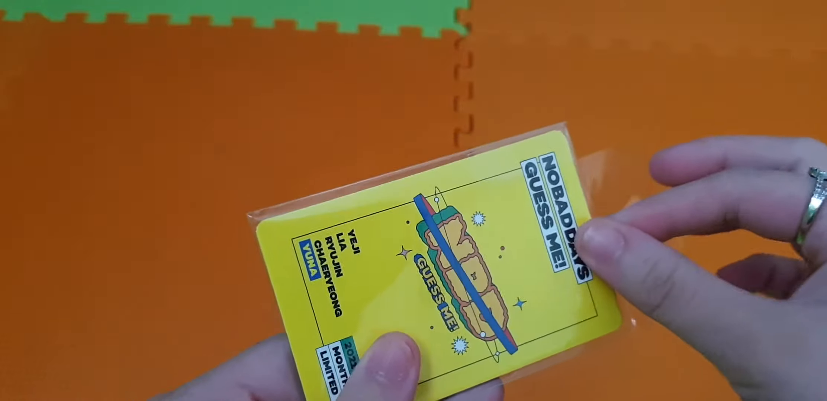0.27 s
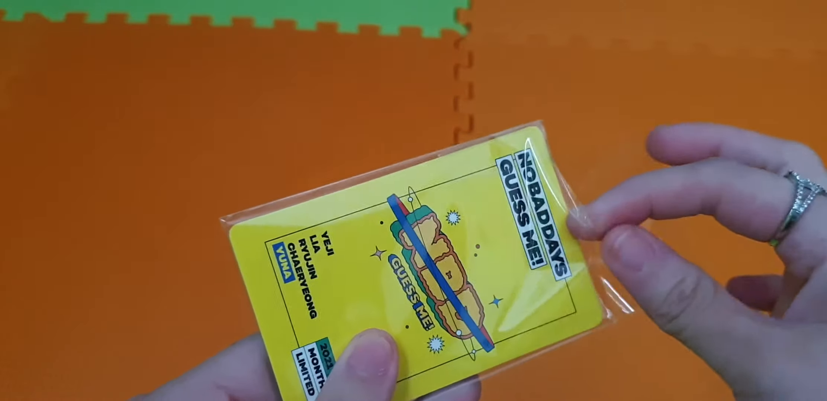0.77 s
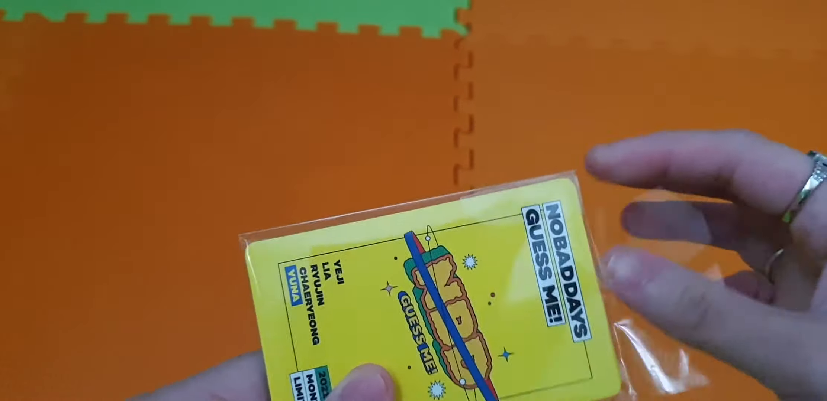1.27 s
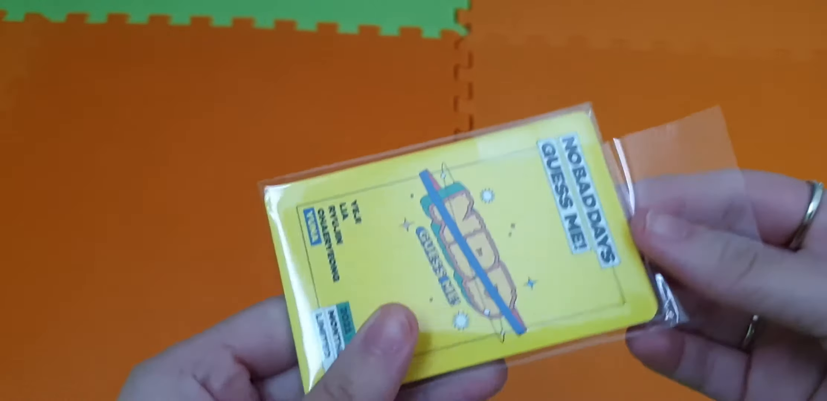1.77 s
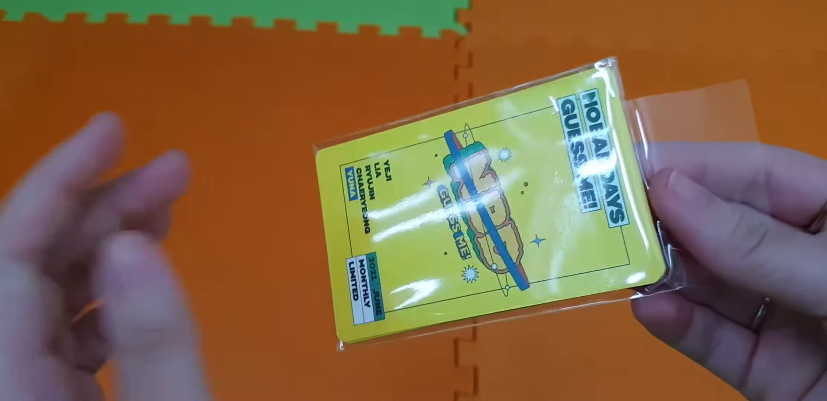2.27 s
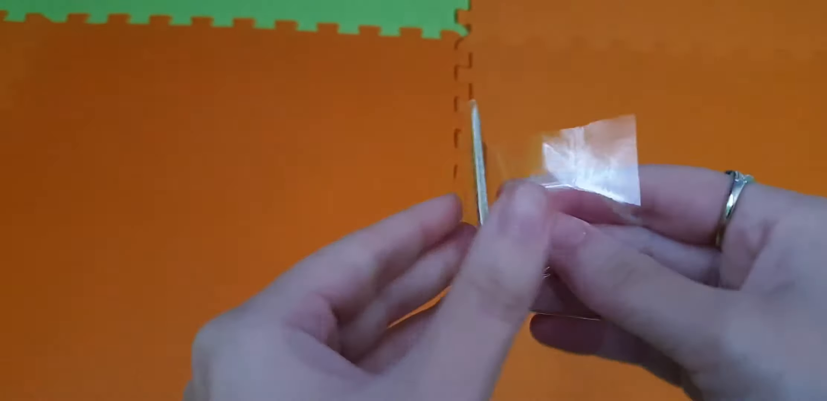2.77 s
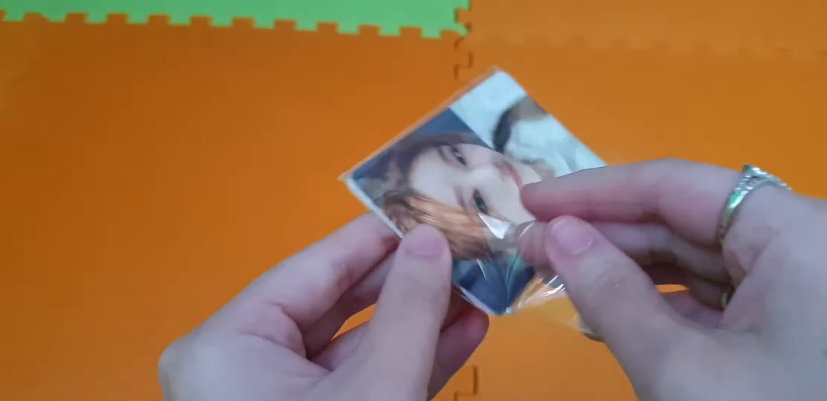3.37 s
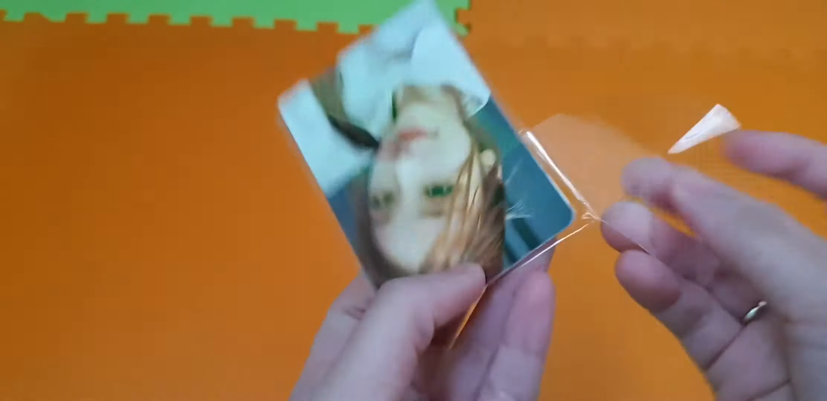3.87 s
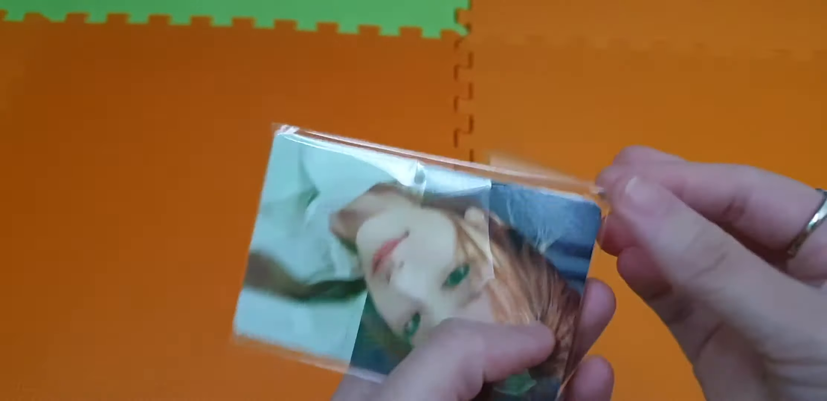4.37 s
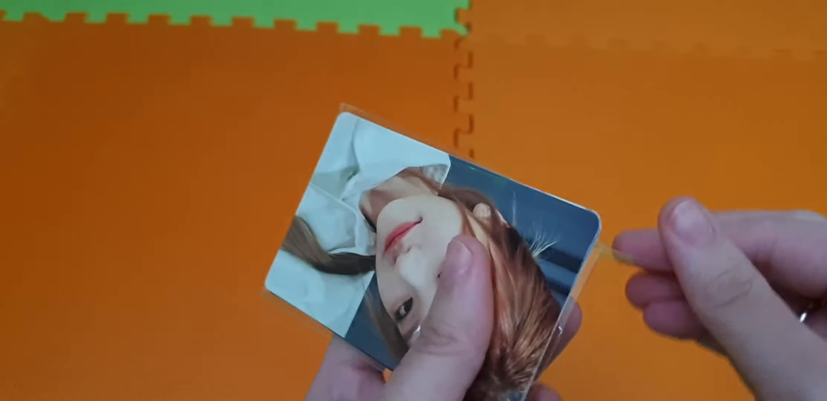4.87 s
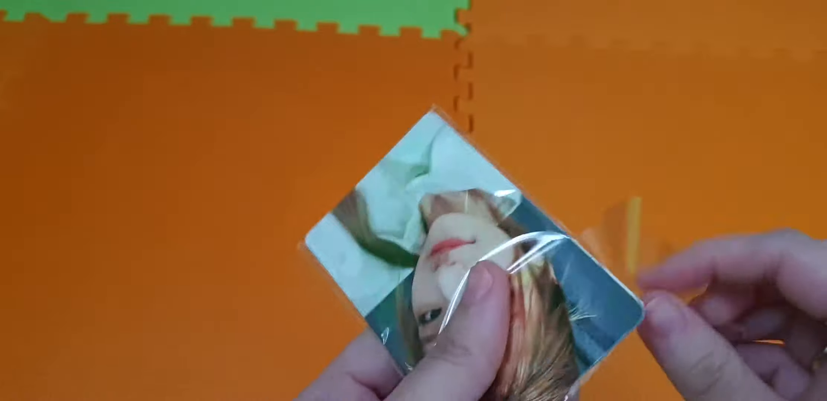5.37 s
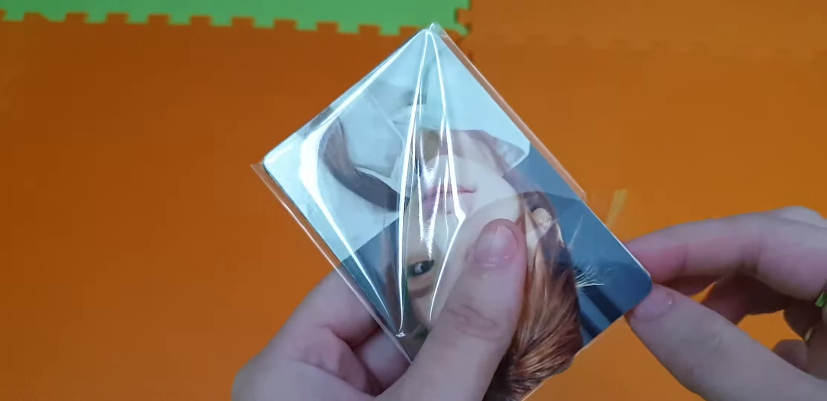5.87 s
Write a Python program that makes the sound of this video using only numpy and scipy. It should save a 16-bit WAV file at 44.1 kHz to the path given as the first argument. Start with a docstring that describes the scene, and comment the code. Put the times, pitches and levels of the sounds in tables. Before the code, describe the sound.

Fingers pick at a thin plastic sleeve and peel it off a card, close to the microphone in a small room. Light rustles, rubs and scattered ticks come first, then a brief pause, then a busy run of sharp crackles and snaps that thins near the end. Underneath are a low motor hum, faint hiss and distant traffic, with a muffled engine slowing and pulling away.

```python
"""Fingers tear and peel a thin plastic sleeve off a card, close under a two-port microphone.
From the start a motor hums and low traffic rumble swells and fades over a faint hiss.
The film rustles and rubs, then its creases buckle with sharp snaps; a foam floor mat returns each
a moment later and the room rings on. After a second a vehicle engine swells through the wall.
The snaps crowd in from 2.7 s and thin out near 6 s, while the engine slows and then pulls away."""
import sys
import numpy as np
from scipy import signal
from scipy.fft import rfft, irfft
from scipy.io import wavfile

SR = 44100
rng = np.random.default_rng(int(sys.argv[2]) if len(sys.argv) > 2 else 0)


def int16_out(signal):
    """Quantize to a 16-bit WAV file."""
    q = np.round(np.clip(np.atleast_2d(signal).T, -1, 1) * 32767)
    wavfile.write(sys.argv[1], SR, q.astype(np.int16))


N = 269892
TIME_S = np.arange(N) / SR


def from_db(db):
    """Amplitude grows tenfold every 20 dB."""
    return 10 ** (np.asarray(db) / 20)


def unit_rms(x):
    """Normalisation to unit mean power."""
    return x / np.sqrt(np.mean(x ** 2) + 1e-20)


def in_time(rows):
    """Linear interpolation of each column after the time, one value per sample."""
    time_s, *columns = np.transpose(rows)
    return [np.interp(TIME_S, time_s, column) for column in columns]


def at_hz(points, hz):
    """Interpolation on a log-frequency axis."""
    knots_hz, values = np.transpose(points)
    return np.interp(np.log(hz), np.log(knots_hz), values)


def band(x, low_hz, high_hz, order=2):
    """Butterworth band-pass."""
    return signal.sosfilt(signal.butter(order, [low_hz, high_hz], "band", fs=SR, output="sos"), x)


def drift(rate_hz):
    """Low-passed noise: a slow random fluctuation with a spread of about 1."""
    hop = 40
    pole = np.exp(-2 * np.pi * hop * rate_hz / SR)
    slow = signal.lfilter([1], [1, -2 * pole, pole * pole], rng.standard_normal(N // hop + 2002))[2000:]
    return np.interp(np.arange(N) / hop, np.arange(len(slow)), unit_rms(slow))


def port_pair(mid, side, coherence):
    """Partial coherence: the ports share one noise in phase and another in antiphase."""
    return np.sqrt(1 + coherence) * mid + np.sqrt(1 - coherence) * side * [[1], [-1]]


# likeness of noise at the two ports: frequency_hz, coherence
NOISE_COHERENCE = [(30, 1), (120, 0.85), (500, 0.78), (2000, 0.14), (8000, 0.15)]
def coloured_noise(spectrum):
    """Spectral shaping of stereo noise to unit rms, most coherent in the bass."""
    hz = np.maximum(np.fft.rfftfreq(N, 1 / SR), 1)
    mid, side = rfft(rng.standard_normal((2, N)))
    white = port_pair(mid, side, at_hz(NOISE_COHERENCE, hz))
    return unit_rms(irfft(white * from_db(at_hz(spectrum, hz)), N))


def drone(hz, level_db, orders, waver_db):
    """A turning machine radiates a line spectrum; each line wavers on its way through walls."""
    phase = 2 * np.pi * np.cumsum(hz) / SR
    lines = 0
    for multiple, gain_db in orders:
        gain = from_db(gain_db + waver_db * drift(4.57))
        lines += gain * np.sin(multiple * phase + rng.uniform(0, 2 * np.pi))
    return np.sqrt(2) * from_db(level_db) * lines


# swell of the hum: time_s, level_db
MOTOR_LEVELS = [(0, -51), (1.5, -55), (4.2, -68), (5, -50.5), (6.12, -44.5)]
# partials of the hum: pitch_multiple, gain_db
MOTOR_ORDERS = [(1, -0.5), (1.5, -12), (2, -20), (2.5, -15), (3, -19.5)]
def motor(pitch_hz=84.93, wander_hz=1.5):
    """Periodic vibration: the partials move together as the motor's pitch wanders."""
    hz = pitch_hz + wander_hz * drift(1.436)
    return drone(hz, *in_time(MOTOR_LEVELS), MOTOR_ORDERS, waver_db=2.0)


# swell of the two rumble layers: time_s, deep_db, upper_db
TRAFFIC_LEVELS = [(0, -51.5, -61.5), (1.2, -47.5, -62), (1.5, -50, -59.5), (2.0, -39.5, -58.5),
                  (2.5, -43.5, -59.5), (3.4, -45.5, -64), (3.7, -47, -56.5), (4.4, -47.5, -57),
                  (4.6, -43, -59), (5.4, -49.5, -51.5), (6.12, -40, -50.5)]
# spectra of those layers: frequency_hz, relative_density_db
DEEP_SPECTRUM = [(15, -51.5), (25, -41), (60, 9), (86, 1.5), (110, 0.5), (177, -7.5), (260, -22.5),
                 (340, -28), (570, -120)]
UPPER_SPECTRUM = [(180, 4), (250, -1), (330, 1.5), (450, 2), (540, -7.5), (640, -18), (800, -39)]
def traffic(deep_gain_db=-3.5):
    """Amplitude modulation: two layers of low noise swell and fade as traffic rumble."""
    deep_db, upper_db = in_time(TRAFFIC_LEVELS)
    deep = from_db(deep_db + deep_gain_db) * coloured_noise(DEEP_SPECTRUM)
    return deep + from_db(upper_db) * coloured_noise(UPPER_SPECTRUM)


# spectrum of the hiss: frequency_hz, relative_density_db
HISS_SPECTRUM = [(350, -13), (600, -7), (834, -2), (1130, 0.5), (1410, -3.5), (1610, -7.5), (1960, -2.5),
                 (2760, -3), (4000, -22.5), (6370, -57.5), (10500, -23.5), (14500, -9), (16000, -28)]
def hiss(level_db=-76):
    """Stationary noise of the room and preamplifier sets the noise floor."""
    return from_db(level_db) * coloured_noise(HISS_SPECTRUM)


# bouts of handling the film: start_s, length_s, low_rustle_db, high_rustle_db, rub_db
BOUTS = [(0.0, 0.025, -68.5, -78, -72.5), (0.184, 0.027, -44.5, -60, -47), (0.506, .27, -76, -66, -74.5),
         (1.002, 0.33, -75, -70, -69.5), (1.253, 0.12, -59.5, -62, -66.5), (1.42, 0.47, -88, -72, -69),
         (1.679, 0.24, -73, -75, -77.5), (2.686, 0.14, -51, -48.5, -72), (2.875, 0.15, -90, -78, -82),
         (3.021, 0.1, -68, -61.5, -70), (3.172, 0.46, -80, -60.5, -63.5), (3.423, 0.091, -55, -50, -55),
         (3.497, 0.23, -56.5, -53, -57), (3.73, 0.29, -61, -50, -69), (4.079, 0.37, -65, -58.5, -64.5),
         (4.44, 0.12, -93, -64, -64.5), (4.599, .32, -71, -74, -57), (4.943, .35, -67, -70.5, -69.5),
         (5.353, 0.052, -51, -42, -49.5), (5.4, 0.052, -42, -63, -54.5), (5.48, 0.096, -53.5, -74, -60),
         (5.578, 0.1, -59, -65, -61.5), (5.705, 0.26, -69.5, -100, -100), (5.794, 0.07, -88, -100, -82),
         (5.983, 0.1, -59.5, -71, -63)]
def handling_levels(grip_db_per_s=20 / 0.0074, settle_db_per_s=595):
    """Exponential growth and decay: a bout swells, holds and dies as the film settles; the loudest leads."""
    t, levels_db = np.arange(0, N / SR, .001), -120
    for start_s, length_s, *held_db in BOUTS:
        before_s, after_s = np.maximum(start_s - t, 0), np.maximum(t - start_s - length_s, 0)
        fall_db = grip_db_per_s * before_s + settle_db_per_s * after_s
        levels_db = np.maximum(levels_db, np.array(held_db)[:, None] - fall_db)
    return [np.interp(TIME_S, t, db) for db in levels_db]


def rustle(level_db, low_hz, high_hz, spread_db, pan_db, median_per_s=1200):
    """A clumped Poisson process: tiny creases give way and excite broad resonances of the film."""
    impulses = from_db(spread_db * np.minimum(rng.exponential(1, N), 5)) * rng.choice([-1, 1], N)
    gives_way = rng.random(N) < median_per_s * from_db(5 * drift(25)) / SR
    resonance, out = rng.integers(0, 8, N), 0
    for k, hz in enumerate(np.geomspace(low_hz, high_hz, 8)):
        grains = band(impulses * gives_way * (resonance == k) + 1e-18, hz / 1.54, hz * 1.75, order=1)
        lag = rng.integers(0, 7)   # creases lie at different distances from the ports
        pair = np.array([np.roll(grains, lag), np.roll(grains, 3)])
        out += pair * from_db(pan_db * rng.normal() * np.array([[1], [-1]]))
    return from_db(level_db) * unit_rms(out)


# spectrum of skin sliding on film: frequency_hz, relative_density_db
RUB_SPECTRUM = [(700, -12.5), (1500, -2.5), (3000, -8), (6500, -7), (11000, -3), (16000, -7)]
def finger_rub(level_db, flutter_db=5.6):
    """Sliding friction makes broadband noise whose level flutters."""
    return from_db(level_db + flutter_db * drift(13)) * coloured_noise(RUB_SPECTRUM)


# loud creases: start_s, level_db, thud_db, body_db, middle_db, left_minus_right_db
# (thud, body and middle offset the level in the three lowest bands)
SNAPS = [(0.162, -56.5, -7, -3, -2, -7), (0.183, -28, -14.5, -14, -12, -4.5),
         (0.1923, -34, -23, -14, -36, 3.5), (0.1935, -33.5, -19, -7.5, -18, -6),
         (0.1994, -37, -30, -11, 0, -11), (0.2029, -39.5, -29, -5, -3, 1),
         (0.3272, -34, -31, -49, -25, 1.5), (0.5267, -51, -23, -32, -23, 4),
         (0.5427, -42.5, -26, -21, -21, 5), (0.5932, -25, -48, -24.5, -37.5, 7),
         (0.615, -39.5, -29, -29, -19, 3), (0.628, -33, -34, -40, -38, 4),
         (0.6816, -32, -29, -24.5, -31, -1), (0.6927, -40, -39, -24, -32, 10),
         (0.7067, -35, -30, -50, -37, -2), (0.7209, -42.5, -30, -23, -27, 8),
         (0.7599, -39, -33, -24, -29, 4), (1.0045, -45.5, -30, -41, -43, -14),
         (1.0306, -42, -24, -23, -35, -1.5), (1.0424, -45, -20, -19, -33, 0),
         (1.0849, -14.5, -41, -30, -39, 3), (1.1476, -28, -39, -27, -32, 1.5),
         (1.2037, -43, -35, -13, -29, 3), (1.2423, -55.5, -23, -11, -5, -2),
         (1.2674, -39.5, -28, -6, -22, -1), (1.3092, -42, -19.5, -20, -24, 2.5),
         (1.3255, -39.5, -9, -11, -19, 1.5), (1.3912, -48, -16, -12, -28, 4),
         (1.4067, -46.5, -12, -29, -28, 0), (1.6257, -50.5, -9, -11, -16.5, 8.5),
         (1.7125, -51, -10.5, -9, -29, 6), (1.7444, -43, -15, -17.5, -27, 4),
         (1.7747, -42.5, -17, -27, -31, 3.5), (1.812, -39.5, -22, -36, -36, -0.5),
         (1.8613, -41, -30, -16, -28.5, 4.5), (1.8881, -47, -28, -33, -24.5, 6),
         (2.6931, -20.5, -40, -25.5, -23, 4), (2.721, -21.5, -22, -20, -20, 0),
         (2.7399, -20.5, -37, -24, -20, 5.5), (2.7442, -13.5, -62, -20, -31, -6),
         (2.7532, -28.5, -21, -4.5, -27, 9), (2.7632, -28, -27, -6, -24, 4),
         (2.7706, -28, -25, -11.5, -32, 7), (2.7804, -6.5, -43, -20, -34, 0.0),
         (2.797, -39.5, -5, -13.5, -29, 15.5), (2.8095, -31.5, -25, -11, -21, 8),
         (2.818, -19.5, -34, -18.5, -19, -1.5), (2.8415, -23.5, -39, -17.5, -25.5, 2),
         (3.028, -44, -28, -22, -30, 5.5), (3.041, -18, -58, -32, -41, 7), (3.1687, -51, -13, -37, -13, 7),
         (3.1833, -48, -22, -34, -11, 5), (3.2067, -45, -27, -31, -12, 14),
         (3.2277, -24.5, -44, -47, -24, -3), (3.2596, -44, -25, -26, -16, 10),
         (3.2833, -26.5, -42, -28, -26, 6.5), (3.3588, -23.5, -31, -22.5, -15.5, 4.5),
         (3.44, -38, -35, -29, -5, 8), (3.4511, -40, -38, -17, -7, 6.0), (3.4601, -33, -35, -11, -5, 7),
         (3.477, -28, -28.5, -6.5, -10, 6.0), (3.495, -28.5, -23, -10, -11, 4.5),
         (3.5267, -30.5, -28, -5, -16, 3.5), (3.5399, -18, -45, -27, -26, -0.5),
         (3.5815, -24, -25, -12, -15, 2.5), (3.6183, -16.5, -32, -20.5, -19.5, 4.5),
         (3.6564, -39.5, -22, -7, -29, 5), (3.6646, -30.5, -20.5, -19, -36, 2),
         (3.725, -41.5, -26, -6.5, -5, 4.5), (3.7633, -38, -36, -7.5, -5, 2),
         (3.7776, -31, -36, -22, -3.5, 0.5), (3.7966, -39, -25, 1, 4, 2), (3.8116, -16, -49, -8, -7.5, 0.5),
         (3.869, -42, -23, -25, -10, -1), (3.8884, -9.5, -35, -22, -35, 4),
         (3.9217, -11.5, -28, -21.5, -13, 1.5), (3.9434, -33.5, -29, -18, -6.5, 2),
         (3.955, -13, -42, -26, -9, 0.5), (4.0914, -29.5, -33, -39, -21.5, -0.5),
         (4.1436, -19.5, -15.5, -16.5, -20, -0.5), (4.2168, -30.5, -32, -10.5, -7, -1),
         (4.3046, -16.5, -39, -22.5, -26, 0.0), (4.3832, -40, -31, -5, -4, 2),
         (4.3935, -29, -21, -18, -12, 0), (4.5274, -44.5, -24, -39, -38, 8),
         (4.5962, -41, -39, -38, -25, 11.5), (4.6222, -36.5, -21, -28, -18, 8),
         (4.6399, -19, -32.5, -19.5, -18, 4), (4.665, -41, -13, 0, -4, 2),
         (4.6874, -17, -43, -14.5, -16, 3.5), (4.7101, -36.5, -8, -9, -5.5, 0),
         (4.7532, -33, -32, -15.5, -10.5, 1), (4.797, -41.5, -30, -34, -12.5, 8),
         (4.8115, -32, -33, -25, -14, 2), (4.8291, -26.5, -29, -22, -10.5, 1),
         (4.857, -5, -42, -26.5, -21, 3), (4.8827, -26.5, -15, -22, -16, 0.5),
         (4.9715, -28.5, -38, -19, -9.5, -0.5), (5.0207, -43.5, -15, -6.5, -7.5, 6.5),
         (5.0577, -36.5, -22, -13, -12, 1.5), (5.0856, -40, -9, -17, -13, 0.5),
         (5.1462, -31, -30, -31, -6, -1), (5.2141, -41, -15, -67, -29, -5.5),
         (5.2656, -39, -17, -49, -15, -1), (5.3315, -50, -25.5, -18, 3.5, 0),
         (5.3664, -40, -29, -40, -25, 1), (5.3986, -28, -31, -8, -12, 0),
         (5.4086, -23.5, -22, -24, -21, -2.5), (5.4447, -24.5, -26, -13.5, -11.5, -1),
         (5.449, -10.5, -39, -28, -16, -0.5), (5.5216, -29, -23, -13.5, -11, -1),
         (5.5416, -26.5, -19, -18, -27, -2.0), (5.6456, -32, -15.5, -19.5, -10.5, 2.5),
         (5.9866, -45.5, -10, 2.5, -6, 0.5), (6.0327, -19, -25.5, -17.5, -27, -5.5)]
# bands in which the film rings: low_hz, high_hz
SNAP_BANDS = [(280, 560), (900, 2500), (2500, 5000), (5000, 10000), (10000, 17000)]
# ring of each band: t60_s
SNAP_DECAYS = [0.016, 0.013, 0.0044, 0.0039, 0.0011]
# weight of each band: gain_db
SNAP_GAINS = [2.5, 6.5, 6, -2, -1.5]
def snaps(rise_s=0.00038, spike_height=4.74, port_lag_s=.00007, widths=(.15, .25, .5, .7, .8)):
    """Buckling releases a pulse and a damped noise burst, less coherent between the ports in the treble."""
    start_s, level_db, thud_db, body_db, middle_db, balance_db = np.transpose(SNAPS)
    colour_db = [thud_db, body_db, middle_db, 0, 0]
    count, size = len(SNAPS), 900
    t, bursts = np.arange(size) / SR, 0
    mid, side = np.swapaxes(rng.standard_normal((count, 2, size)), 0, 1)
    far_port = np.outer([-1, 1], balance_db) > 0
    spike_at = np.round((rise_s + port_lag_s * far_port) * SR).astype(int)
    for k, t60_s in enumerate(SNAP_DECAYS):
        envelope = from_db(-60 * t / t60_s) * (1 - np.exp(-t / rise_s))
        pair = np.array([mid + widths[k] * side, mid - widths[k] * side]) * envelope
        pair[[[0], [1]], np.arange(count), spike_at] += spike_height * np.sign(mid[:, 0])
        pair = (-1) ** k * band(pair, *SNAP_BANDS[k])   # neighbours add in phase where they meet
        peak = np.abs(pair.mean(axis=0)).max(axis=1)
        bursts += pair * (from_db(level_db + colour_db[k] + SNAP_GAINS[k]) / peak)[:, None]
    bursts *= from_db(np.outer([.5, -.5], balance_db))[:, :, None]
    out = np.zeros((2, N + size))
    for burst, onset_s in zip(np.swapaxes(bursts, 0, 1), start_s):
        at = round(onset_s * SR)
        out[:, at:at + size] += burst
    return out[:, :N]


# early reflections off the mat: delay_s, gain_db
MAT_ECHOES = [(.00128, -12.5), (.0036, -19.5), (.0062, -25)]
def mat(film):
    """Dipole radiation: the film's underside echoes off the mat inverted; later echoes alternate in sign."""
    out = film.copy()
    for k, (delay_s, gain_db) in enumerate(MAT_ECHOES):
        lag = round(delay_s * SR)
        out[:, lag:] += from_db(gain_db) * (-1) ** (k + 1) * film[:, :-lag]
    return out


# reverberation time of the room: frequency_hz, t60_s
ROOM_DECAYS = [(500, 0.34), (2000, 0.24), (6000, 0.21), (14000, 0.17)]
# likeness of the tail at the two ports: frequency_hz, coherence
ROOM_COHERENCE = [(300, 1), (1500, 0.65), (6000, 0.54)]
def room(film, gain_db=-12, onset_s=0.00083):
    """A diffuse field decays exponentially, lasting longer and staying more coherent in the bass."""
    t, edges_hz = np.arange(SR // 2) / SR, 250 * 2 ** np.arange(0, 6.3, .5)
    mid, side = rng.standard_normal((2, len(t)))
    tail = 0
    for low_hz, high_hz in zip(edges_hz, edges_hz[1:]):
        centre_hz = np.sqrt(low_hz * high_hz)
        white = port_pair(mid, side, at_hz(ROOM_COHERENCE, centre_hz))
        tail += band(white, low_hz, high_hz) * from_db(-60 * t / at_hz(ROOM_DECAYS, centre_hz))
    tail *= 1 - np.exp(-t / onset_s)
    tail /= np.sqrt(np.sum(tail ** 2, axis=1, keepdims=True))
    return from_db(gain_db) * signal.fftconvolve(film, tail, axes=1)[:, :N]


# engine beyond the wall, slowing and pulling away: time_s, firing_hz, level_db
ENGINE_RUN = [(.8, 37.5, -75.5), (1.6, 37, -54), (2.0, 38, -60), (2.41, 36, -51), (3.66, 34.3, -57.5),
              (4.23, 29.5, -52.5), (4.74, 29.2, -55), (5.41, 31.3, -54), (6.12, 33, -62)]
# its harmonics: firing_multiple, gain_db
ENGINE_ORDERS = [(2, -5.5), (3, -2), (4, -3.5), (5, -6), (6, -10.5), (7, -16), (8, -21.5), (9, -34.5),
                 (10, -26.5), (11, -24)]
def engine():
    """Periodic firing makes a harmonic series that glides with the engine's speed."""
    return drone(*in_time(ENGINE_RUN), ENGINE_ORDERS, waver_db=3.0)


def scene():
    """Superposition: the film with its reflections, over machines, traffic and hiss."""
    low_db, high_db, rub_db = handling_levels()
    film = snaps()
    film += rustle(low_db, low_hz=940, high_hz=3450, spread_db=3.0, pan_db=3.6)
    film += rustle(high_db, low_hz=4700, high_hz=10400, spread_db=11.0, pan_db=2.9)
    film += finger_rub(rub_db)
    distant = (motor() + engine() + traffic()) * from_db([[1.1], [-1.1]])   # a little to the left
    return mat(film) + room(film) + distant + hiss()


def record(dry, capsule_top_hz=15130, stopband_hz=17146):
    """Band limiting: the capsule rolls off the top, then a steep low-pass cuts the band."""
    rolled = signal.sosfilt(signal.butter(8, capsule_top_hz, fs=SR, output="sos"), dry)
    return signal.sosfilt(signal.cheby2(12, 70, stopband_hz, fs=SR, output="sos"), rolled)


dry = scene()
out = record(dry)
int16_out(out)
```